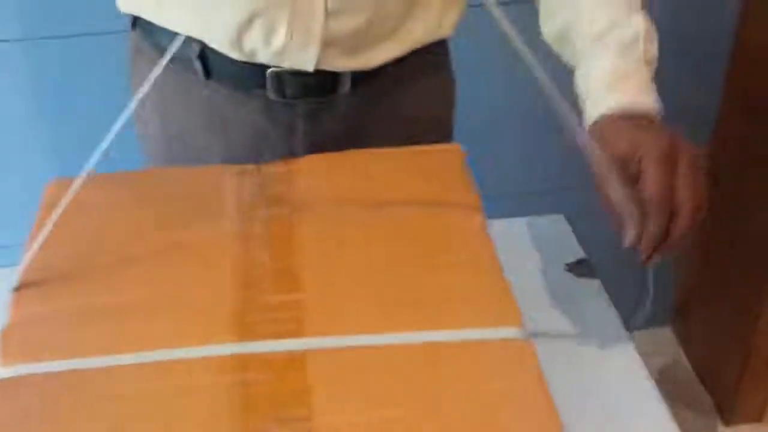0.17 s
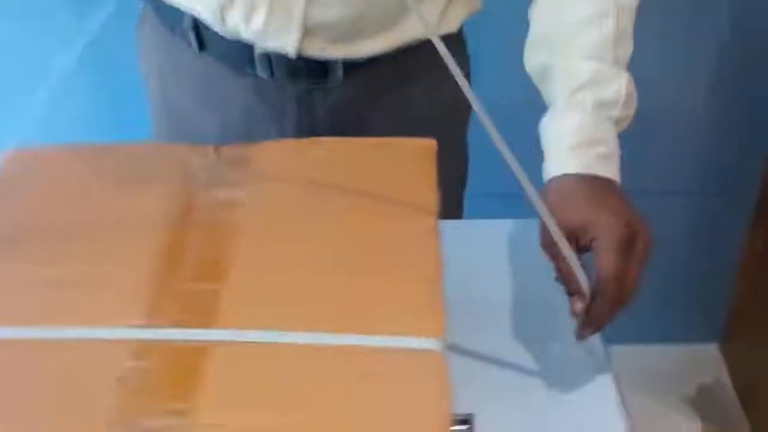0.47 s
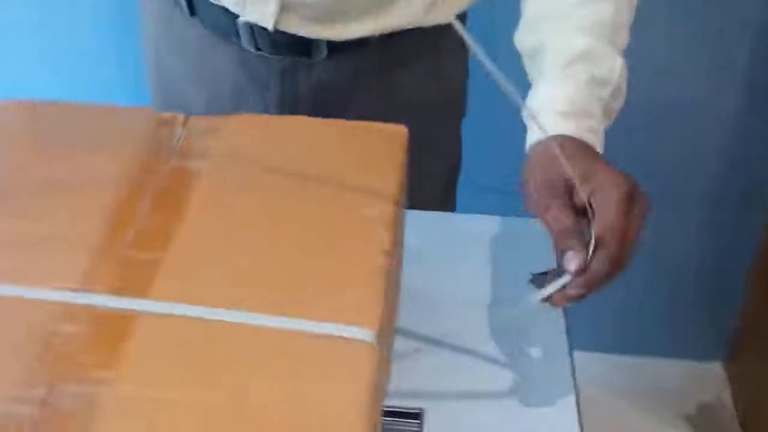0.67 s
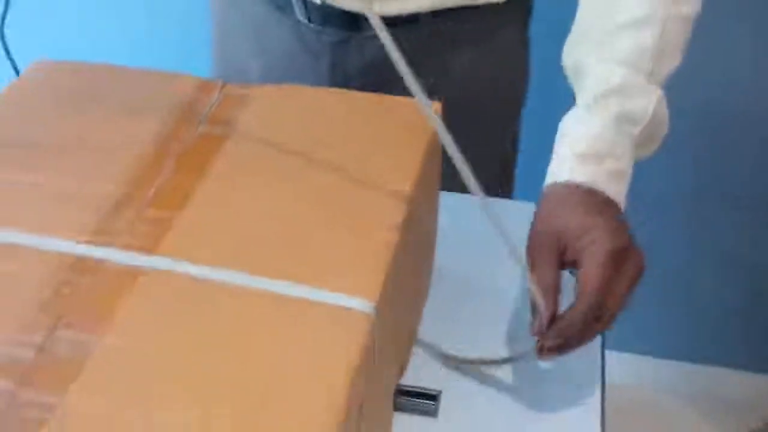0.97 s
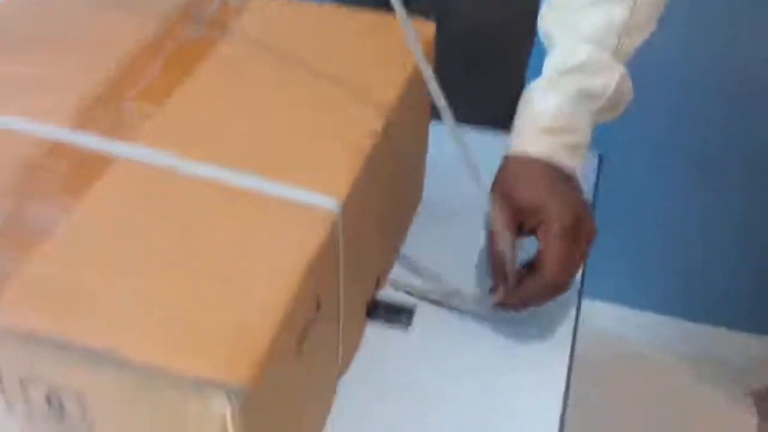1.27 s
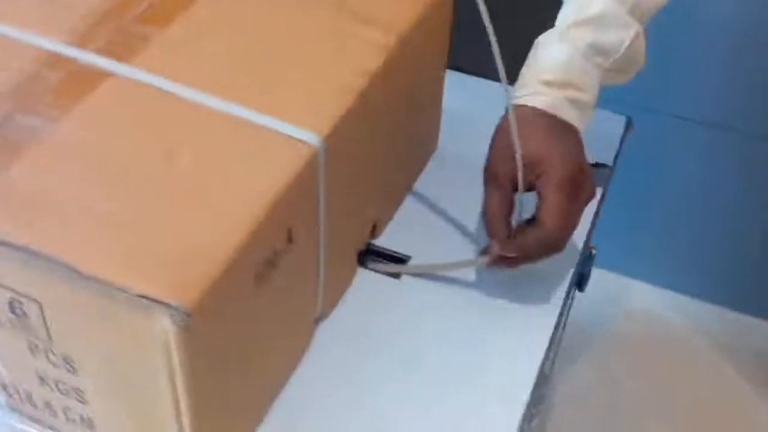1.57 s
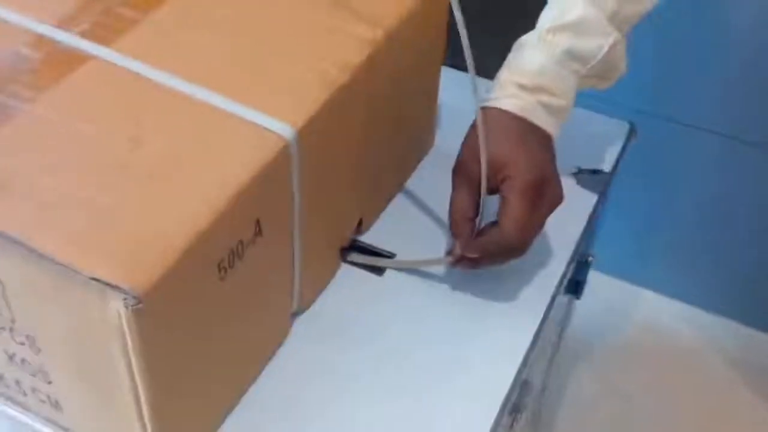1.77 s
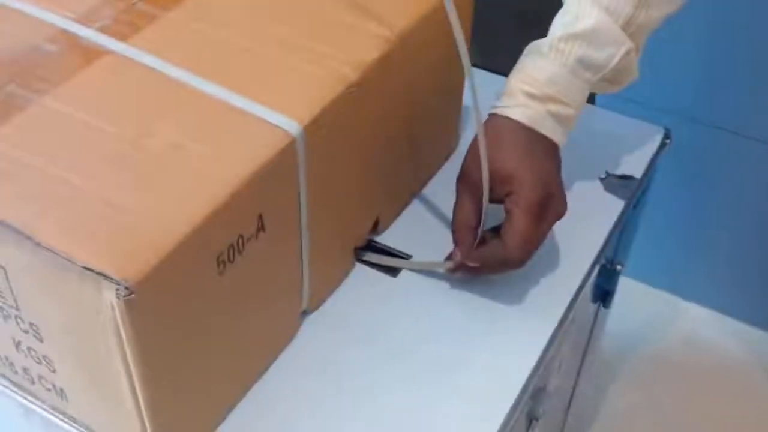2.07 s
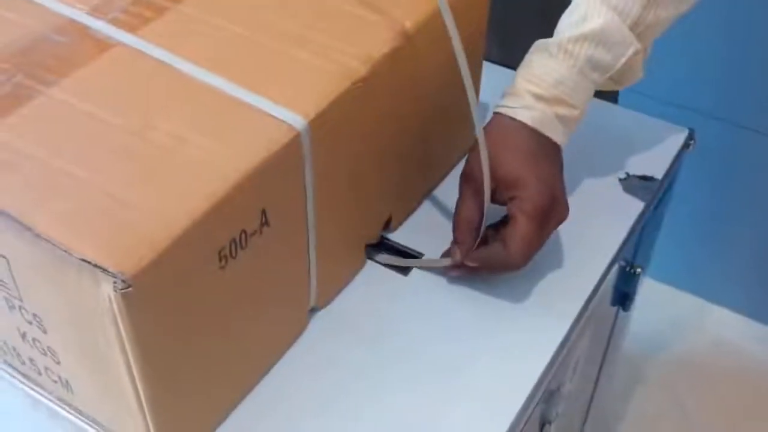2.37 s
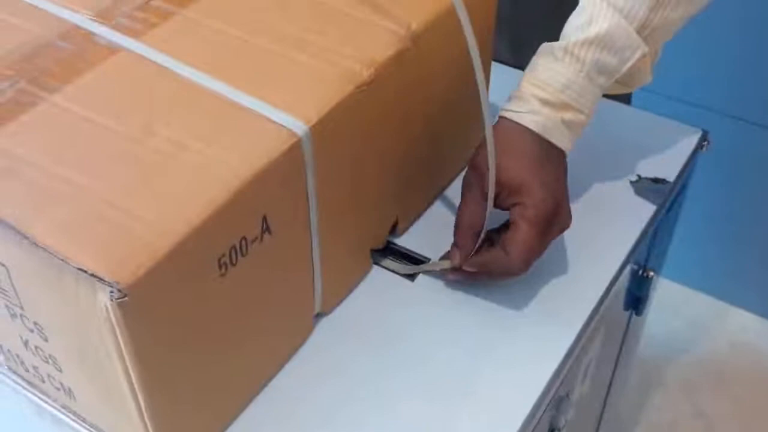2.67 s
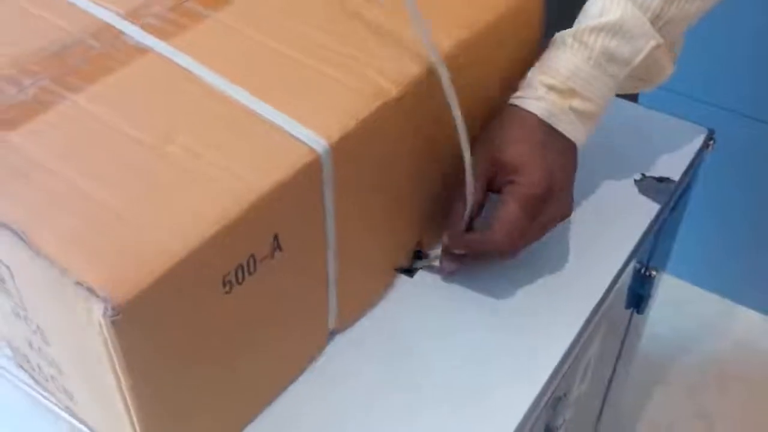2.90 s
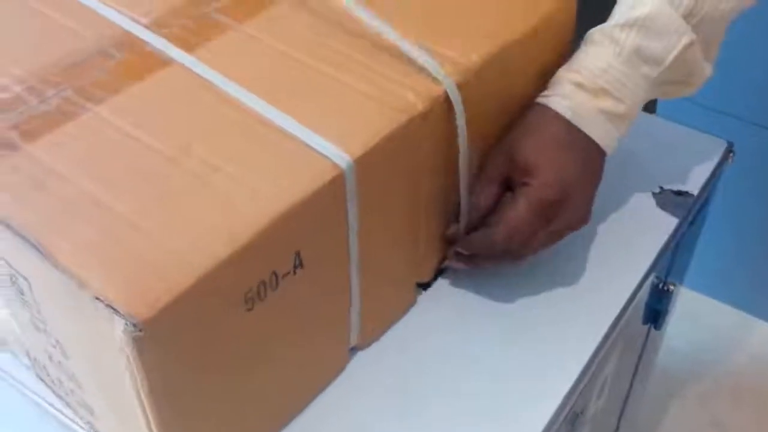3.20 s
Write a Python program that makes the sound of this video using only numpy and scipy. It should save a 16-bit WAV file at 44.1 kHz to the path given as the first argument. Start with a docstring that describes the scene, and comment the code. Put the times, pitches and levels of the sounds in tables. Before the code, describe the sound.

A carton bumps and scrapes on a humming strapping machine while plastic strap whips and rattles.

```python
"""First comes the hum of a strapping machine's motor, which runs throughout. A carton is then turned and
shoved about on the machine's steel table: the hollow box thumps, scuffs and slides, and the steel rings.
A stiff plastic strap whips and twangs, and the feed rollers catch it with a short rattle.
Knocks and tiny stick-and-slip clicks set box, table and strap ringing, each with its own notes.
A small, hard room echoes around it all, heard close up in stereo."""
import sys
import numpy as np
from scipy import signal
from scipy.fft import rfft, irfft
from scipy.io import wavfile
from scipy.ndimage import uniform_filter1d

SR = 44100
rng = np.random.default_rng(int(sys.argv[2]) if len(sys.argv) > 2 else 0)


def digitize_waveform(pressure):
    """Quantize a signal to 16-bit integers and store it at the path in sys.argv[1].

    Rows of a 2-D input are taken as channels; values are limited to [-1, 1].
    """
    field = np.atleast_2d(pressure).T
    bounded = np.clip(field, -1, 1)
    quanta = np.round(bounded * 32767).astype(np.int16)
    wavfile.write(sys.argv[1], SR, quanta)


N = 147294

# How long the room takes to fade by 60 dB: f/Hz, fade time/s
ROOM_FADE = [(150, 0.08), (600, 0.53), (2500, 0.2), (6000, 0.5), (12000, 0.25)]
# Stereo width: f/Hz, level of the side signal against the middle/dB
STEREO_WIDTH = [(30, -7), (100, -20), (300, -19.5), (600, -12), (900, -11), (1300, -1.5), (2500, -0.5),
                (15000, 0)]
# The motor's two strong tones, mains then shaft: f/Hz, drift/Hz, trim/dB
STRONG_HUM = [(99.8, 0.33, -0.5), (143.1, 3.27, -1)]
# How those two swell and sink, before the trim: t/s, mains level/dB, shaft level/dB
HUM_SWELLS = [(0.0, -33, -36.5), (0.3, -31, -32), (0.48, -40, -31.5), (0.77, -30, -33.5), (0.9, -34, -25.5),
              (1.08, -38, -58), (1.17, -28.5, -36), (1.22, -29, -47), (1.49, -39, -43), (1.62, -27, -32.5),
              (1.79, -33, -24), (2.34, -46, -41), (2.4, -40, -38), (2.69, -54, -24), (2.84, -34, -49),
              (2.92, -50, -35), (3.1, -25.5, -40), (3.34, -36, -28)]
# Faint motor tones: f/Hz, level/dB, waver/dB
FAINT_HUM = [(53.4, -41, 3.5), (266.5, -39, 5), (406, -49.5, 3), (1164, -52, 5)]

# Tone colours of the noises: f/Hz, relative level/dB
RUNNING_COLOUR = [(20, -6), (42, -21.5), (75, -7), (130, 0), (200, -4.5), (280, -3), (400, -4.5),
                  (520, -12.5), (780, -13), (1150, -16.5), (1600, -21), (2300, -20), (3300, -27.5),
                  (4500, -29.5), (6300, -33.5), (8000, -41.5), (10000, -44.5), (13000, -76), (16000, -78)]  # the machine running
DRONE_COLOUR = [(18, 3), (35, 22), (53, 17.5), (75, 22), (120, -5), (300, -116)]  # the table's deep drone
GLIDE_COLOUR = [(1500, -14), (4200, 7), (6500, 2.5), (8000, 1), (10000, 5), (13000, 0.5), (16000, -8)]  # cardboard gliding on steel
RASP_COLOUR = [(500, -41.5), (1300, 14), (1800, 11), (3200, 9), (4500, -2), (7000, -5.5), (15000, -71)]  # rough cardboard
HISS_COLOUR = [(2000, 0.5), (4500, -0.5), (6500, 3), (8000, 0), (10000, 2), (14000, -6), (16000, -16.5)]  # fine rubbing
# Modes, the notes an object rings with (narrow ones ring longer): f/Hz, width/Hz, relative level/dB
CARTON_MODES = [(112, 40, -13), (137.2, 17, 2), (175, 17.4, -6), (238.6, 20.5, 0), (264.7, 11.4, 2.5),
                (288.5, 20.4, 1), (353.5, 49, -4), (394.3, 45, -3), (440, 83, -8.5)]  # the hollow box
PANEL_MODES = [(410, 88, 2), (518, 97, 1.5), (625, 38, 6), (700, 53, 3.5), (800, 71, 2), (970, 197, -1),
               (1150, 300, -2.5), (1296, 100, 0), (1560, 620, -11.5)]  # the table panel
STEEL_MODES = [(682, 13, 6.5), (1132, 4.9, 15), (1217, 15, 0), (3990, 100, -5), (4260, 100, -13)]  # the thin ring of the steel top
STRAP_MODES = [(1056, 360, 9), (1840, 670, -3.5), (2034, 126, 5), (2620, 300, -7), (3030, 360, -0.5),
               (3520, 370, 2), (4070, 330, 3.5), (4330, 610, 1), (5300, 710, 0)]  # the plastic strap

# The table drones under the moving load: t/s, level/dB
DRONE_LEVELS = [(.7, -56), (1.2, -34), (1.6, -36), (1.76, -35), (1.95, -51), (2.4, -41), (2.9, -54),
                (3.3, -39)]
# The carton slides: t/s, rumble level/dB, scuff level/dB, hiss level/dB
SLIDE_LEVELS = [(0.847, -36, -33, -65), (1.0, -43, -42, -51), (1.15, -49, -35, -46),
                (1.35, -65, -37.5, -47.5), (1.62, -42, -36, -43.5), (1.68, -33.5, -29.5, -28),
                (1.79, -18, -41, -46), (1.87, -25.5, -28, -31.5), (2.02, -27, -31, -60),
                (2.269, -42.5, -55, -52), (2.37, -36, -34.5, -41.5), (2.55, -35, -45, -47.5),
                (2.72, -31.5, -34, -48), (2.88, -29.5, -41, -76)]
# The carton's edge strikes the steel: t/s, level/dB, centre f/Hz
STEEL_HITS = [(0.741, -28.5, 1120), (1.054, -32, 2200), (2.326, -32, 1840)]
# The strap whips: t/s, rise/s, decay/s, ring level/dB, ring centre f/Hz, hiss level/dB,
# twang level/dB, twang f/Hz
STRAP_WHIPS = [(0.737, 0.0076, 0.0068, -47, 3030, -63, -26.5, 2970),
               (1.9, 0.015, .014, -33, 2100, -50, -28, 2270),
               (2.042, 0.016, 0.03, -15.5, 2460, -30.5, -40, 2240),
               (2.085, 0.052, 0.14, -30, 2580, -49, -43, 2200),
               (2.666, 0.0055, 0.074, -34.5, 3000, -39.5, -34.5, 3170),
               (2.933, 0.013, 0.017, -12.5, 3730, -29.5, -22, 2130),
               (2.976, 0.034, 0.0036, -18.5, 3200, -18, -20.5, 2620),
               (3.156, 0.0057, 0.03, -17, 2750, -18, -26, 3430)]
# Sharp ticks: t/s, decay/s, rasp level/dB, hiss level/dB
SHARP_TICKS = [(1.6448, 0.0025, -9, -18), (1.6629, 0.0016, -26, -12.5), (1.728, 0.0014, -40, -22),
               (1.87, 0.003, -30, -30), (1.953, 0.0013, -33, -36), (3, 0.0033, -11.5, -19),
               (3.012, 0.001, -17, -19)]
# Knocks of carton and machine: t/s, rise/s, decay/s, thump level/dB, thump centre f/Hz,
# panel level/dB, panel centre f/Hz, rasp level/dB, hiss level/dB
BLOWS = [ (0.735, 0.0027, 0.018, -23.5, 375, -38, 1400, -27, -38.5),
         (0.745, 0.0039, 0.049, -19.5, 350, -36, 1310, -44, -61),
         (0.772, 0.0035, 0.016, -12.5, 297, -45, 1140, -39, -66),
         (.882, 0.005, 0.014, -19, 140, -48, 900, -28, -62),
         (.946, 0.006, 0.091, -25.5, 300, -34, 800, -34.5, -41),
         (1.044, 0.015, 0.018, -30, 327, -23.5, 690, -28, -36.5),
         (1.647, 0.004, 0.0045, -16, 330, -17, 740, -30, -42),
         (1.66, 0.00082, 0.0022, -31, 150, -20, 820, -16.5, -29),
         (1.720, 0.0053, 0.035, -15.5, 193, -24.5, 900, -22, -26.5),
         (1.765, 0.0057, 0.0097, -34, 250, -20.5, 1040, -24, -62),
         (1.776, 0.0024, 0.0086, -12.5, 347, -45, 450, -27, -59),
         (1.796, 0.004, 0.058, -18, 175, -28.5, 980, -27.5, -53),
         (1.825, 0.00295, 0.015, -20, 300, -54, 900, -35, -48),
         (1.893, .012, 0.028, -19, 400, -20.5, 1100, -29.5, -35.5),
         (1.916, 0.0039, 0.012, -19, 265, -29, 655, -44, -50),
         (1.951, 0.0035, 0.014, -28, 394, -28, 655, -38, -32),
         (2.318, 0.0021, 0.026, -21, 288, -22.5, 1100, -32.5, -32.5),
         (2.674, .008, 0.046, -17.5, 245, -29.5, 1100, -28, -60),
         (2.690, 0.0049, 0.044, -23.5, 398, -44, 700, -44, -61),
         (2.940, 0.0048, 0.01, -22, 470, -15.5, 470, -44, -40),
         (2.955, 0.0078, 0.041, -36, 290, -24, 625, -42, -50),
         (2.980, 0.0056, 0.016, -14, 405, -23, 410, -34, -45),
         (3.005, 0.0018, 0.0062, -9.5, 258, -15.5, 1040, -22, -33),
         (3.066, 0.008, 0.0093, -28, 450, -16, 1000, -34, -25),
         (3.099, 0.0021, 0.0067, -23, 290, -32, 1150, -39, -25),
         (3.113, 0.0018, 0.0063, -17, 269, -29, 800, -38, -37),
         (3.218, 0.0057, 0.032, -21, 307, -21.5, 1010, -27, -37)]


def undb(db):
    """Turn decibels into a gain."""
    return 10 ** (np.asarray(db) / 20)


def unit(x):
    """Scale a signal to an average power of 1."""
    return x / np.sqrt(np.mean(x ** 2))


def clock():
    """The time of every sample, in seconds."""
    return np.arange(N) / SR


def on_log(points, hz):
    """Read between (f/Hz, value) points, spaced by octaves."""
    f, values = np.array(points, float).T
    return np.interp(np.log(hz + 1), np.log(f), values)


def add(track, start, sound):
    """Mix a short sound in at a given time."""
    i = int(start * SR)
    track[i:i + len(sound)] += sound[:N - i]


def convolve(x, response):
    """Pass a sound through a response scaled to an energy of 1."""
    return signal.fftconvolve(x, response / np.sqrt(np.sum(response ** 2)))[:N]


def colour(x, points, size=8192):
    """Filter a sound to give it a tone colour."""
    gains = undb(on_log(points, np.fft.rfftfreq(size, 1 / SR)))
    cepstrum = irfft(np.log(gains))
    # Folding onto the first half keeps the filter from sounding before its input.
    cepstrum[1:size // 2] *= 2
    cepstrum[size // 2 + 1:] = 0
    return convolve(x, irfft(np.exp(rfft(cepstrum))))


def dull(x, above_hz):
    """Soften the treble."""
    return signal.sosfilt(signal.butter(2, above_hz, fs=SR, output="sos"), x)


def resonance(modes, size=8192):
    """An object's fading notes after one push, with an energy of 1."""
    t = np.arange(size) / SR
    notes = sum((-1) ** k * undb(db) * width * np.exp(-np.pi * width * t) * np.cos(2 * np.pi * hz * t)
                for k, (hz, width, db) in enumerate(modes))
    return notes / np.sqrt(np.sum(notes ** 2))


def ring(force, modes):
    """An object rings as a force shakes it."""
    return convolve(force, resonance(modes))


def focused(modes, centre_hz, db_per_octave=11.5):
    """Where an object is touched decides which of its notes speak most."""
    return [(hz, width, db - db_per_octave * abs(np.log2(hz / centre_hz))) for hz, width, db in modes]


def wander(per_s):
    """A smooth random wobble with a size near 1."""
    hold = int(SR / per_s)
    steps = np.repeat(rng.standard_normal(N // hold + 2), hold)
    return unit(uniform_filter1d(uniform_filter1d(steps, hold), hold)[:N])


def friction(clicks_per_s=2500, spread_db=3):
    """Rubbing surfaces stick and slip: dense, uneven clicks over smooth noise."""
    size_db = spread_db * np.minimum(rng.exponential(size=N), 2)
    slips = rng.random(N) < clicks_per_s / SR
    clicks = slips * rng.choice([-1, 1], N) * undb(size_db)
    return unit(unit(clicks) + rng.standard_normal(N))


def burst(start, rise, decay):
    """A level that climbs in a straight line, then dies away."""
    age = clock() - start
    return np.clip(age / rise, 0, 1) * np.exp(-np.maximum(age - rise, 0) / decay)


def stereo(middle, side):
    """Left and right: alike in the bass, unrelated in the treble."""
    width = undb(on_log(STEREO_WIDTH, np.fft.rfftfreq(len(middle), 1 / SR)))
    total = np.sqrt(1 + width ** 2)
    shared = irfft(rfft(middle) / total, len(middle))
    opposed = irfft(rfft(side) * width / total, len(middle))
    return np.array([shared + opposed, shared - opposed])


def room_echoes(size=32768, early_s=0.015, build_s=0.056, early_db=-5.5, tail_db=-6):
    """Quick echoes off table and wall, then a tail whose bands each fade at their own speed."""
    t, hz = np.arange(size) / SR, np.fft.rfftfreq(size, 1 / SR)
    noise, tail = rfft(rng.standard_normal(size)), 0
    for band_hz, fade_s in ROOM_FADE:
        band = on_log([(f, f == band_hz) for f, _ in ROOM_FADE], hz)
        tail = tail + irfft(noise * band) * np.exp(-np.log(1000) * t / fade_s)
    tail = tail * (1 - np.exp(-t / build_s))
    early = rng.standard_normal(size) * np.exp(-t / early_s) * (t > .001)
    return (undb(tail_db) * unit(tail) + undb(early_db) * unit(early)) / np.sqrt(size)


def motor_tone(hz, drift_hz):
    """One motor tone whose pitch wanders slightly."""
    cycles = rng.random() + np.cumsum(hz + drift_hz * wander(6)) / SR
    return unit(np.sin(2 * np.pi * cycles))


def motor(noise_db=-28.5, flutter_db=1.4):
    """Mains and shaft hum swell and sink over fainter tones and the running noise."""
    times, *levels = np.array(HUM_SWELLS).T
    strong = sum(undb(np.interp(clock(), times, db) + trim_db) * motor_tone(hz, drift_hz)
                 for (hz, drift_hz, trim_db), db in zip(STRONG_HUM, levels))
    faint = sum(undb(db + waver_db * wander(7)) * motor_tone(hz, drift_hz=1.504)
                for hz, db, waver_db in FAINT_HUM)
    noise = stereo(*(colour(rng.standard_normal(N), RUNNING_COLOUR) for _ in range(2)))
    return strong + faint + noise * undb(noise_db + flutter_db * wander(39.5))


def steel_top():
    """The sheet-steel top rings on after a sharp knock."""
    rings = np.zeros(N)
    strength = np.sqrt(0.049 * SR)  # as much energy as 49 ms at the listed level
    for start, db, centre_hz in STEEL_HITS:
        add(rings, start, undb(db) * strength * resonance(focused(STEEL_MODES, centre_hz)))
    return rings


def carton_slide(rasp_db=-4.5):
    """Cardboard drags over steel: the box rumbles, the panel scuffs and drones, the surface hisses."""
    times, *levels = np.array(SLIDE_LEVELS).T
    rumble, scuff, hiss = (undb(np.interp(clock(), times, db, left=-90)) for db in levels)
    drone = undb(np.interp(clock(), *np.array(DRONE_LEVELS).T))
    return (ring(rumble * friction(), CARTON_MODES)
            + ring(scuff * friction(), PANEL_MODES)
            + undb(rasp_db) * colour(scuff * friction(), RASP_COLOUR)
            + colour(hiss * friction(), GLIDE_COLOUR)
            + colour(drone * friction(), DRONE_COLOUR))


def feed_rollers(start_s=2.94, rise_s=0.073, let_go_s=3.106, fade_s=0.17, throb_hz=48, throb_depth=0.19):
    """The rollers draw in the strap, which grabs and slips, and shake the table in a throbbing rattle."""
    t = clock()
    grip = np.clip((t - start_s) / rise_s, 0, 1) * np.exp(-np.maximum(t - let_go_s, 0) / fade_s)
    cycles = np.cumsum(throb_hz * (1 + 0.14 * wander(30.12))) / SR
    throb = 1 + throb_depth * np.sin(2 * np.pi * cycles)
    grabs = undb(2.5 * wander(per_s=200))
    effort = grip * throb * grabs
    return (undb(-24.5) * ring(effort * friction(), CARTON_MODES)
            + undb(-30.5) * ring(effort * friction(), focused(PANEL_MODES, centre_hz=1100))
            + undb(-24.5) * ring(effort * friction(), STRAP_MODES)
            + undb(-23.5) * colour(effort * friction(), RASP_COLOUR)
            + undb(-30.5) * colour(effort * friction(), HISS_COLOUR))


def strap_whips(twang_width_hz=100, rasp_db=-11.5):
    """The stiff strap rasps over an edge and rings; each whip has its own brightness and twang."""
    rub = friction()
    body, force, hiss = np.zeros((3, N))
    for start, rise, decay, ring_db, ring_hz, hiss_db, twang_db, twang_hz in STRAP_WHIPS:
        shape = burst(start, rise, decay)
        ringing = undb(ring_db) * resonance(focused(STRAP_MODES, ring_hz))
        twang = undb(twang_db) * resonance([(twang_hz, twang_width_hz, 0)])
        body += signal.fftconvolve(shape * rub, ringing + twang)[:N]
        force += shape * undb(ring_db)
        hiss += shape * undb(hiss_db)
    body += undb(rasp_db) * colour(force * friction(), RASP_COLOUR)
    return dull(body, above_hz=7060) + colour(hiss * friction(), HISS_COLOUR)


def carton_knocks(tick_rise_s=0.00018):
    """Each blow thumps the hollow box, clatters on the panel and scuffs; ticks only rasp and hiss."""
    thumps, panel, rasp, hiss = np.zeros((4, N))
    chatter = friction()
    strength = np.sqrt(2 * 0.0028 * SR)  # as much energy as 5.6 ms at the listed level
    for start, rise, decay, thump_db, thump_hz, panel_db, panel_hz, rasp_db, hiss_db in BLOWS:
        thump = resonance(focused(CARTON_MODES, thump_hz, db_per_octave=23.5))
        add(thumps, start + rise, undb(thump_db) * strength * thump)
        shape = burst(start, rise, decay)
        contact = (shape * chatter)[int(start * SR):][:SR // 2]
        clatter = signal.fftconvolve(contact, resonance(focused(PANEL_MODES, panel_hz)))
        add(panel, start, undb(panel_db) * clatter)
        rasp += shape * undb(rasp_db)
        hiss += shape * undb(hiss_db)
    for start, decay, rasp_db, hiss_db in SHARP_TICKS:
        shape = burst(start, tick_rise_s, decay)
        rasp += shape * undb(rasp_db)
        hiss += shape * undb(hiss_db)
    thumps = dull(thumps, above_hz=900)  # soft cardboard muffles the blows
    scuffs = colour(rasp * friction(), RASP_COLOUR) + colour(hiss * friction(), HISS_COLOUR)
    return thumps + panel + scuffs


def scene(bounce_s=0.004, direct_db=-0.5):
    """Bounces off the table top widen the direct sound; the room and the motor surround it."""
    handling = carton_knocks() + steel_top() + strap_whips() + carton_slide() + feed_rollers()
    t = np.arange(1024) / SR
    bounces = rng.standard_normal(len(t)) * np.sqrt(t) * np.exp(-t / bounce_s)
    direct = stereo(handling, convolve(handling, bounces))
    echoes = stereo(room_echoes(), room_echoes())
    room = np.array([signal.fftconvolve(handling, ear)[:N] for ear in echoes])
    return undb(direct_db) * direct + room + motor()


def record(dry, top_hz=16150):
    """Clip the sound at full scale and cut the highest treble."""
    return signal.sosfilt(signal.ellip(10, .2, 70, top_hz, fs=SR, output="sos"), np.clip(dry, -1, 1))


dry = scene()
out = record(dry)
digitize_waveform(out)
```